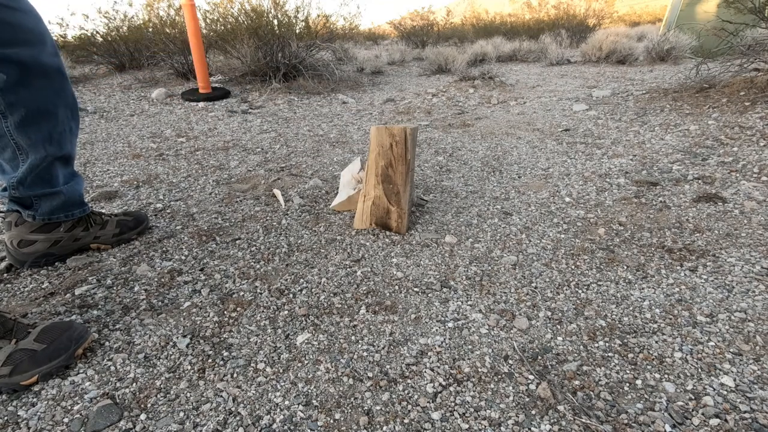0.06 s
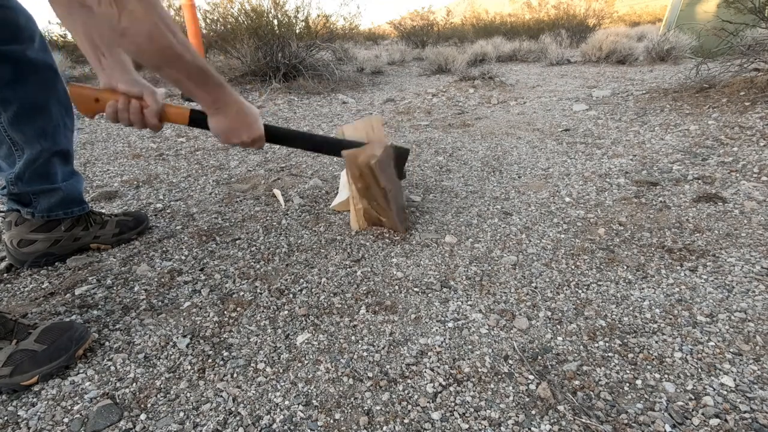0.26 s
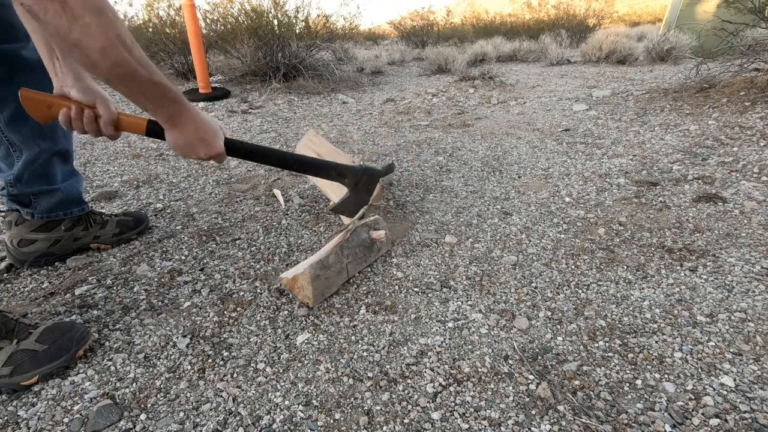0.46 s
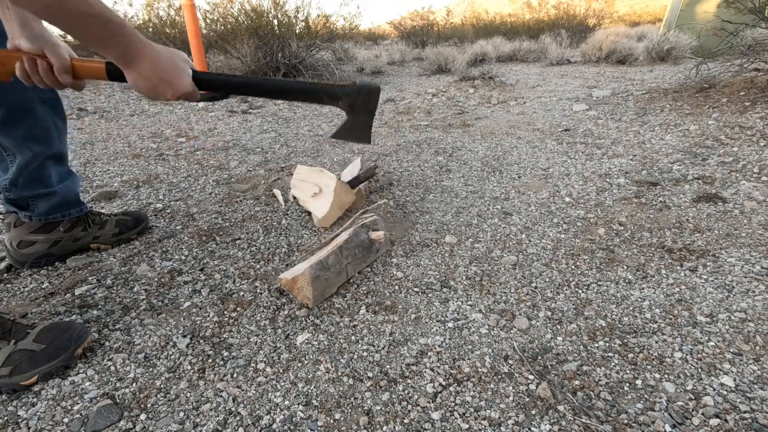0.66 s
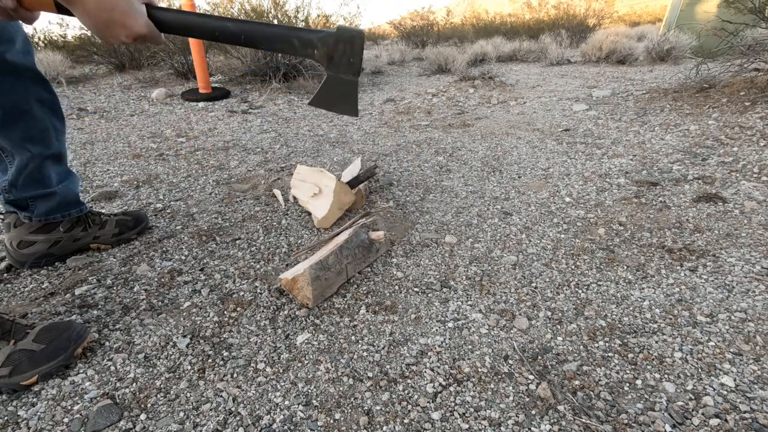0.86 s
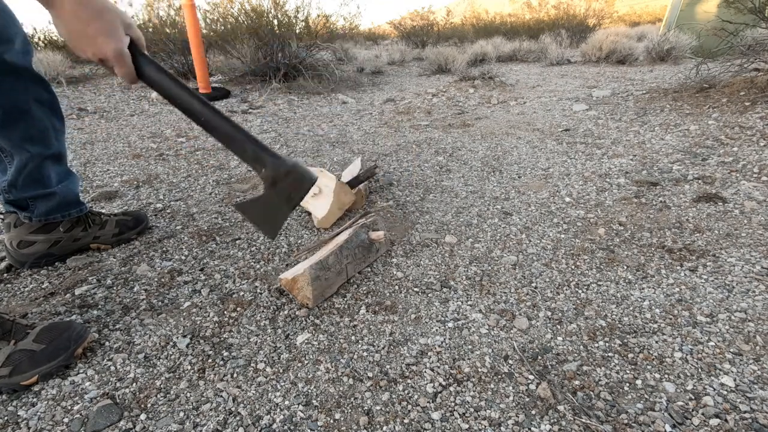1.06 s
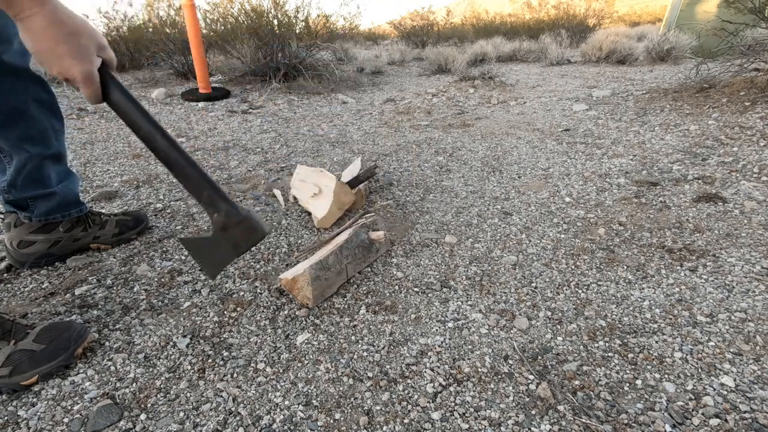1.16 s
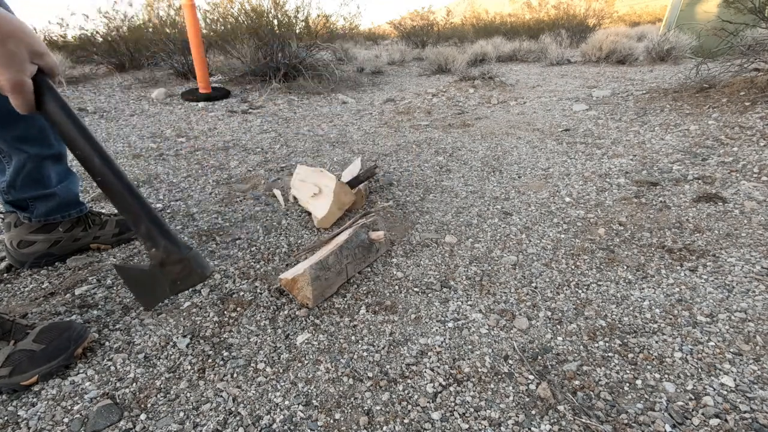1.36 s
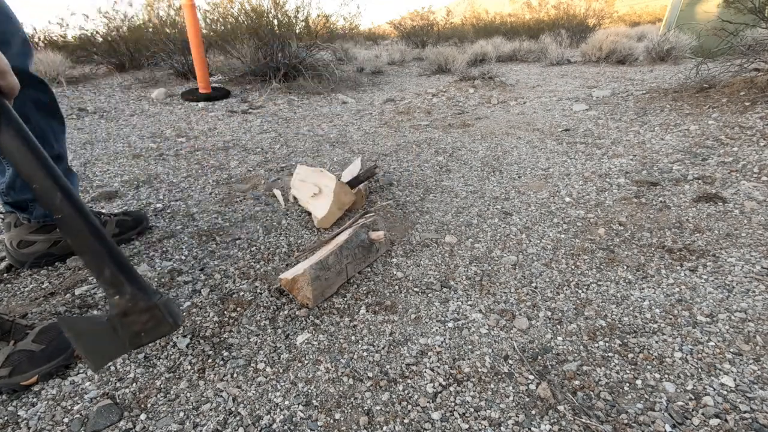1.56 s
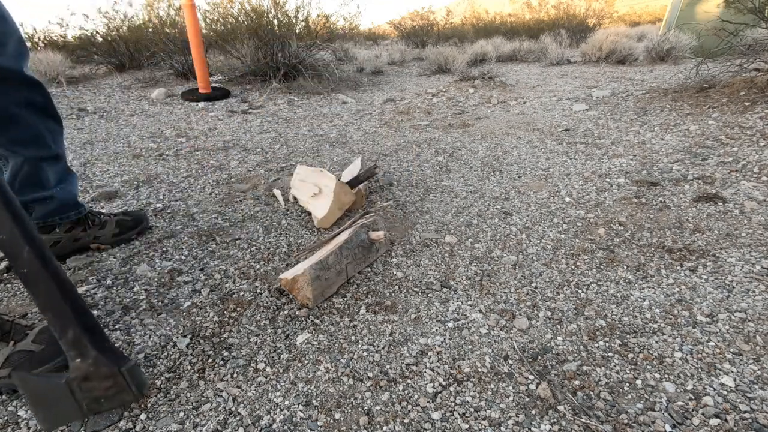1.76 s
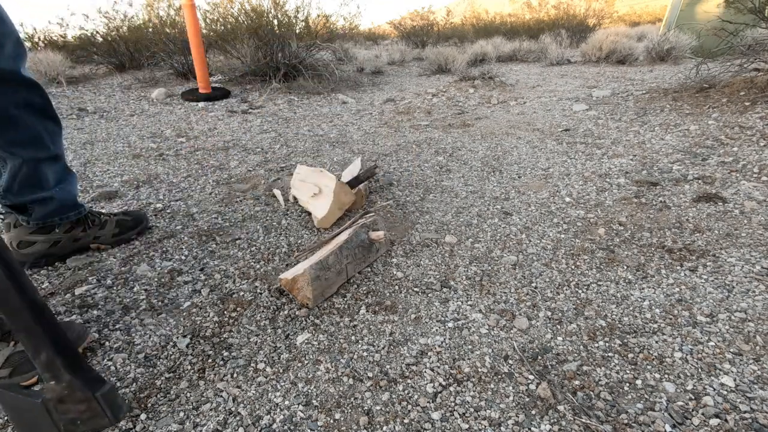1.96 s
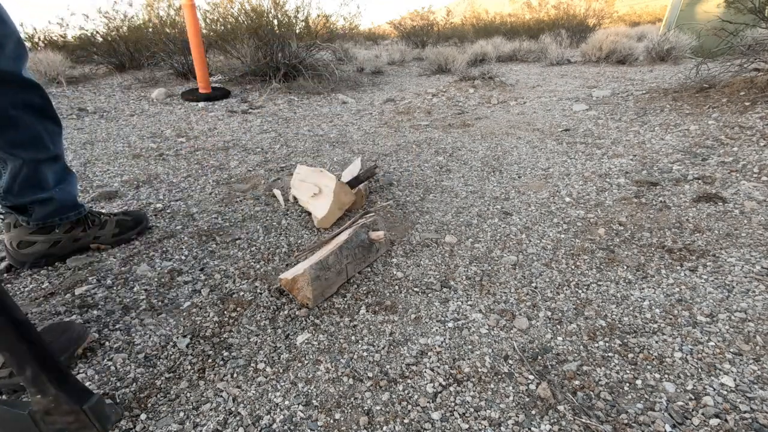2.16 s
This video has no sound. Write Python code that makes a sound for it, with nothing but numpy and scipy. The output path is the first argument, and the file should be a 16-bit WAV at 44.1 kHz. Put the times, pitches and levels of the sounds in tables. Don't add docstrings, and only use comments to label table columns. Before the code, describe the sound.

Sharp axe chop with splintering wood, pieces knocking on stones, light wind, faint gravel scrape

```python
import sys
import numpy as np
from scipy import signal
from scipy.io import wavfile

SR = 44100
rng = np.random.default_rng(int(sys.argv[2]) if len(sys.argv) > 2 else 0)


def wav_record(signal):
    frames = np.transpose(np.atleast_2d(signal))
    bounded = np.clip(frames, -1, 1)
    quanta = np.round(bounded * 32767).astype(np.int16)
    wavfile.write(sys.argv[1], SR, quanta)


def natural_amplitude(level_db):
    exponent = np.asarray(level_db, float) / 20
    return 10 ** exponent


N = 97020


def at_hz(points, hz):
    point_hz, point_db = np.transpose(points)
    return np.interp(np.log(hz), np.log(point_hz), point_db)


def rms_one(x):
    return x / np.sqrt(np.mean(x ** 2) + 1e-20)


def filtered(x, kind, hz):
    return signal.sosfilt(signal.butter(2, hz, kind, fs=SR, output="sos"), x)


def ring(x, hz, t60_s):
    r = natural_amplitude(-60 / (max(t60_s, 1e-4) * SR))
    w = 2 * np.pi * min(hz, .45 * SR) / SR
    return signal.lfilter([0, np.sin(w)], [1, -2 * r * np.cos(w), r * r], x + 1e-18)


def drift(rate_hz, size):
    settle = 8000
    r = np.exp(-2 * np.pi * rate_hz / SR)
    wander = signal.lfilter([1], [1, -2 * r, r * r], rng.standard_normal(size + settle))
    return rms_one(wander[settle:])


def grains(colour, size, rate_hz, cycles, uneven_db, count=24):
    draw = rng.random((4, size))
    happens = draw[0] < rate_hz / SR
    height = natural_amplitude(uneven_db * np.minimum(-np.log(draw[1] + 1e-9), 4))
    clicks = happens * height * np.sign(draw[2] - .5)
    dealt = (draw[3] * count).astype(int)
    out = 0
    for k, hz in enumerate(np.geomspace(colour[0][0], colour[-1][0], count)):
        once = ring(clicks * (dealt == k), hz, cycles / np.sqrt(2000 * hz))
        twice = ring(once, hz, 5 / np.sqrt(2000 * hz))
        out = out + natural_amplitude(at_hz(colour, hz)) * hz ** 1.378 * twice
    return rms_one(out)


def stroke(curve, colour, rate_hz, cycles, uneven_db, lumpy_db, lump_hz):
    s, db = np.transpose(curve)
    a, b = int(min(s) * SR), min(int(max(s) * SR), N)
    level_db = np.interp(np.arange(a, b) / SR, s, db) + lumpy_db * drift(lump_hz, b - a)
    out = np.zeros(N)
    out[a:b] = natural_amplitude(level_db) * grains(colour, b - a, rate_hz, cycles, uneven_db)
    return out


def struck(hits, modes, contact_s):
    flutter_db, flutter_hz = 4, 70
    out, t = np.zeros(N), np.arange(200) / SR
    a = int(hits[0][0] * SR)
    for hz, db, t60_s in modes:
        force = np.zeros(N + 200)
        for s, hit_db in hits:
            i = int(s * SR)
            touch = rng.standard_normal(200) * np.exp(-t / contact_s)
            force[i:i + 200] += natural_amplitude(db + hit_db) * touch / np.sqrt(np.sum(touch ** 2))
        flutter = natural_amplitude(flutter_db * drift(flutter_hz, min(SR // 3, N - a)))
        out[a:a + SR // 3] += ring(force[a:a + SR // 3], hz, t60_s)[:N - a] * flutter
    return out


def knocks(table, colour, broad_db, cycles, rise_s):
    size = 6000
    out, t = np.zeros(N + size), np.arange(size) / SR
    grit = grains(colour, N + size, 20000, 6.0, 2.5)
    for s, db, hz, t60_s in table:
        i = int(s * SR)
        once = ring(rng.standard_normal(size), hz, cycles / hz)
        tone = rms_one(ring(once, hz, 3 / hz))
        shape = (1 - np.exp(-t / rise_s)) * natural_amplitude(-60 * t / max(t60_s, .004))
        out[i:i + size] += natural_amplitude(db - 5) * shape * (tone + natural_amplitude(broad_db) * grit[i:i + size])
    return out[:N]


# (frequency [Hz], density [dB per Hz])
AIR = [(12, -27), (20, 2.5), (344, -21), (407, -27), (1050, -34.5), (2870, -39.5), (3690, -38),
       (15800, -52)]


def air():
    air_db, gust_db, wind_left_db = -54, 2.5, 5
    edges_hz = 20 * 2 ** np.arange(0, 10, .5)
    white = rng.standard_normal((2, 2, N))
    gust = np.array([drift(3.2, N), drift(5, N)])
    wind_db = gust_db * gust + wind_left_db * np.array([[.5], [-.5]])
    out = 0
    for k, (low, high) in enumerate(zip(edges_hz, edges_hz[1:])):
        band = filtered(white[k % 2], "band", [low, min(high, .45 * SR)])
        hz = np.sqrt(low * high)
        out = out + natural_amplitude(at_hz(AIR, hz) + wind_db / (1 + (hz / 250) ** 2)) * band
    return natural_amplitude(air_db + 4) * rms_one(out)


# (time [s], level [dB])
SHUFFLE = [(0, -72.5), (.2, -65), (.85, -63), (.98, -61.5), (1.12, -71.5), (1.36, -66), (1.55, -76.5),
           (1.8, -64.5), (1.9, -59.5), (1.98, -70.5), (2.2, -57.5)]
# (frequency [Hz], density [dB per Hz])
CLOTH = [(700, -5.5), (1800, -1), (3500, -3.5), (4900, -1.5), (6500, -5.5), (13000, -18)]


def shuffle():
    return stroke(SHUFFLE, CLOTH, 9000, 12.0, 2.7, 0.86, 20)


# (time [s], level [dB])
SOLE = [(1.1, -82.5), (1.18, -58), (1.24, -70), (1.6, -75), (1.7, -62), (1.8, -53), (1.9, -62),
        (2.0, -71.5)]
# (frequency [Hz], density [dB per Hz])
SOLE_COLOUR = [(200, -1.5), (700, -2.5), (1050, -8), (1500, -8), (2200, -19)]


def sole_creak():
    return stroke(SOLE, SOLE_COLOUR, 1500, 40.0, 2.5, 2.77, 38.9)


# (time [s], level [dB])
DRAG = [(2.02, -75), (2.07, -57), (2.11, -46), (2.15, -45.5), (2.2, -51.5)]
# (frequency [Hz], density [dB per Hz])
DRAG_COLOUR = [(2400, -9.5), (3600, -2.5), (4800, 2.5), (5700, -6.5), (6400, 2.5), (7200, -7.5),
               (11000, -12.5), (15000, -27.5)]
# (time [s], level [dB])
GRIND = [(2.08, -94), (2.13, -54.5), (2.16, -44), (2.2, -54.5)]
# (frequency [Hz], density [dB per Hz])
GRIND_COLOUR = [(300, -12.5), (420, -2), (600, -12), (1500, -9.5), (2600, -15)]


def head_drag():
    scrape = stroke(DRAG, DRAG_COLOUR, 16000, 16.0, 2.5, 1.0, 60)
    return scrape + stroke(GRIND, GRIND_COLOUR, 3000, 7.7, 3.14, 0.79, 40)


# (time [s], level [dB])
STEEL_HITS = [
    (1.8562, -28),
    (1.858, -36.5),
    (1.8725, -43.5),
    (1.896, -55),
]
# (frequency [Hz], level [dB], t60 [s])
STEEL = [(2430, -16, 0.094), (3450, -10, .08), (6160, -18.5, 0.25), (6570, -2, 0.035), (7910, 0, 0.036),
         (8260, -27.5, 0.25), (10540, -11.5, 0.035), (12830, -13, .04)]


def steel_touch():
    return struck(STEEL_HITS, STEEL, 0.0002246)


# (time [s], level [dB])
CHIP_HITS = [
    (1.317, -44.5),
    (1.321, -36),
]
# (frequency [Hz], level [dB], t60 [s])
CHIP = [(1884, -6, 0.1), (2433, -3, 0.048), (3800, 4, 0.027)]


def chip_drop():
    return struck(CHIP_HITS, CHIP, 0.0013)


# (time [s], peak [dB], pitch [Hz], t60 [s])
GRIT = [
    (1.3165, -31.5, 3410, 0.084),
    (1.856, -30.5, 6240, 0.057),
    (1.872, -38.5, 5880, 0.081),
]


def grit_under():
    return knocks(GRIT, CRUNCH, -30.5, 3.45, 0.0009)


# (time [s], level [dB])
ROLL = [(.35, -67), (.42, -49.5), (.45, -36), (.53, -44), (.575, -49.5), (.62, -45.5), (.68, -41.5),
        (.74, -49.5), (.8, -65)]
# (frequency [Hz], density [dB per Hz])
GRAVEL = [(1000, -11), (1400, -3), (1800, 2.5), (3200, -4.5), (4700, -10), (8100, -16), (15500, -31)]


def roll():
    return stroke(ROLL, GRAVEL, 5000, 14.0, 3.5, 2.2, 50)


# (time [s], peak [dB], pitch [Hz], t60 [s])
TICKS = [(.512, -41.5, 1680, 0.078), (.569, -37.5, 5000, 0.065), (.777, -39.5, 1740, .035),
         (.848, -39.5, 4660, 0.029), (.849, -39, 10200, 0.031), (1.178, -54, 894, 0.075),
         (1.319, -32.5, 470, 0.11), (1.409, -36.5, 1564, .025), (1.544, -43, 3683, 0.041),
         (1.704, -42.5, 1540, .025), (1.772, -25, 1500, 0.014), (1.7725, -32.5, 3800, 0.0096),
         (2.022, -45.5, 6276, 0.024)]


def pebble_ticks():
    return knocks(TICKS, CRUNCH, -13.5, 7.3, 0.001)


# (time [s], peak [dB], pitch [Hz], t60 [s])
KNOCKS = [(.433, -6.5, 3240, 0.032), (.448, -24.5, 3040, 0.012), (.469, -25, 1770, 0.02),
          (.489, -25, 6940, 0.027), (.543, -25.5, 2760, 0.027), (.547, -30, 5200, 0.015),
          (.595, -14.5, 1240, 0.034), (.599, -18, 4630, 0.013), (.639, -31, 2200, 0.03),
          (.694, -26, 5800, 0.041), (.714, -24, 640, 0.041)]
# (frequency [Hz], density [dB per Hz])
CRUNCH = [(800, -28.5), (1200, -9.5), (3000, -0.5), (8100, -11), (15500, -31.5)]


def halves_knock():
    return knocks(KNOCKS, CRUNCH, -1.5, 6.4, .002)


# (time [s], level [dB], pitch [Hz], t60 [s])
THUMPS = [
    (0.2433, -12, 227, 0.018),
    (0.2503, -7, 130, 0.029),
    (.27, -34.5, 100.8, .15),
    (.434, -40, 248, 0.058),
    (0.592, -46.5, 159, 0.081),
    (0.715, -42, 324, 0.036),
    (1.177, -52, 74, 0.85),
    (1.189, -50, 188, 0.115),
    (1.315, -45, 149.5, 0.056),
]


def thumps():
    out, t = np.zeros(N + SR // 2), np.arange(SR // 2) / SR
    for s, db, hz, t60_s in THUMPS:
        i = int(s * SR)
        onset = 1 - np.exp(-t * hz * 2.7)
        out[i:i + len(t)] -= natural_amplitude(db + 12 - 60 * t / t60_s) * np.sin(2 * np.pi * hz * t) * onset
    return out[:N]


# (frequency [Hz], level [dB], t60 [s])
LOG = [(1044, -4.5, 0.014), (660, -31, 0.17), (1450, -13.5, 0.018), (2240, -15.5, 0.023), (2896, -6, 0.014),
       (13000, -40.5, 0.34)]


def log_blow():
    blow_s = .2428
    hits = [(blow_s, -3), (blow_s + 0.0016, -1.5), (blow_s + .004, -3)]
    return struck(hits, LOG, 0.00053)


# (time [s], peak [dB], pitch [Hz], t60 [s])
SNAPS = [
    (.2535, -7, 2900, .015),
    (.261, -3.5, 7000, .012),
    (.2685, -6.5, 2000, .015),
    (.2735, -3.5, 3300, 0.013),
    (.286, -17.5, 4426, .03),
    (.297, -19.5, 4800, 0.019),
    (.317, -28, 6000, .02),
    (.336, -31, 4900, 0.027),
    (.376, -36, 4783, 0.04),
]


def splinter_snaps():
    return knocks(SNAPS, FIBRE, -3, 4.0, 0.00056)


# (time [s], level [dB])
TEAR = [(.2375, -53.5), (.2424, -33.5), (.243, -6), (.251, -6), (.258, -22), (.274, -15), (.294, -34),
        (.33, -50.5), (.36, -61)]
# (frequency [Hz], density [dB per Hz])
FIBRE = [(500, -30), (900, -19), (1600, -7.5), (3200, -4.5), (6000, -7), (9000, -11.5), (12000, -20),
         (15500, -29.5)]


def wood_tear():
    return stroke(TEAR, FIBRE, 14000, 9.0, 3.0, 1.8, 150)


def ports(x):
    port_hz, port_shelf_db = 520, -19.5
    spread_hz, spread_db = 7000, -13
    high = filtered(x, "high", port_hz)
    right = high + natural_amplitude(port_shelf_db) * (x - high)
    scatter = rng.standard_normal(220) * np.exp(-np.arange(220) / 40)
    side = np.convolve(x, scatter / np.sqrt(np.sum(scatter ** 2)))[:N]
    side = natural_amplitude(-24.0) * side + natural_amplitude(spread_db) * filtered(side, "high", spread_hz)
    return np.array([natural_amplitude(-1.1) * x + side, natural_amplitude(-0.57) * right - side])


def scene():
    chop = wood_tear() + splinter_snaps() + log_blow()
    fall = halves_knock() + pebble_ticks() + roll()
    moves = shuffle() + sole_creak()
    head = steel_touch() + chip_drop() + grit_under() + head_drag()
    return ports(chop + fall + moves + head + thumps()) + air()


def roll_off(x):
    return signal.sosfilt(signal.butter(12, 15900, fs=SR, output="sos"), x)


def record(dry):
    flattened = dry / (1 + np.abs(dry) ** 8) ** (1 / 8)
    lowpass = signal.cheby2(10, 50, 15900 * 1.3, fs=SR, output="sos")
    mix = signal.sosfilt(lowpass, flattened)
    return roll_off(mix)


dry = scene()
out = record(dry)
wav_record(out)
```